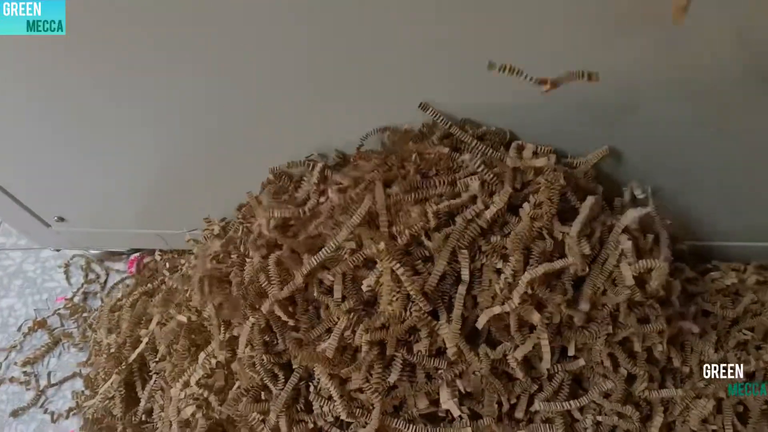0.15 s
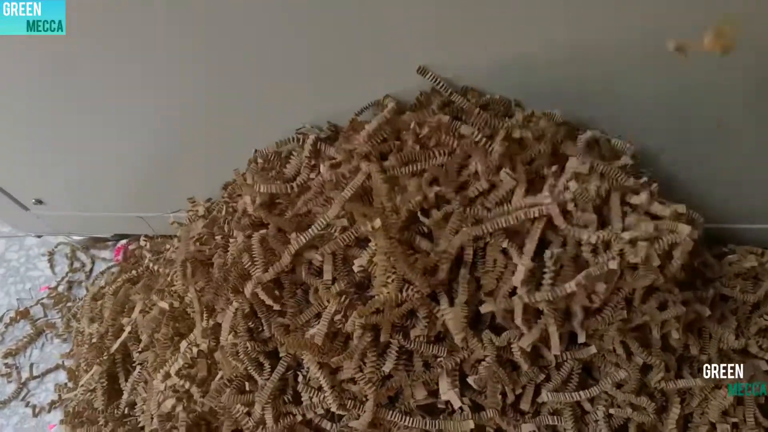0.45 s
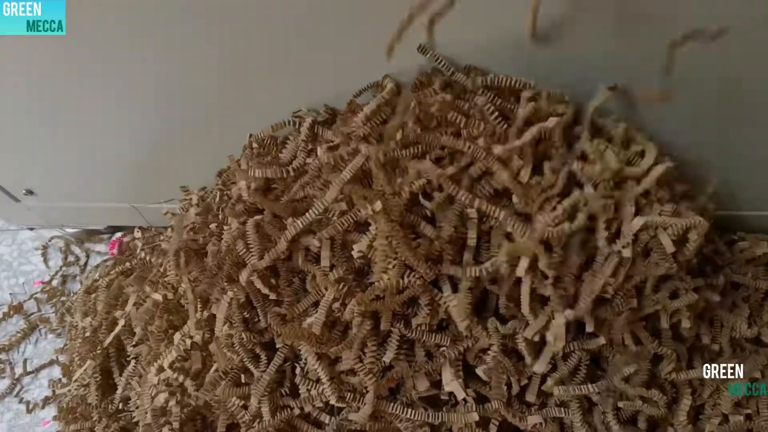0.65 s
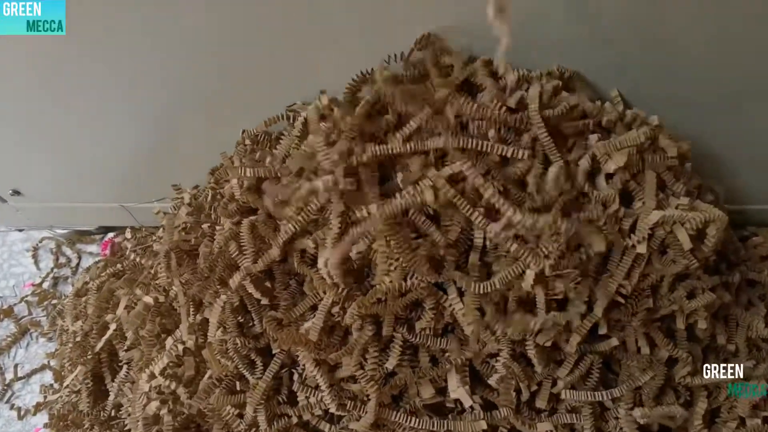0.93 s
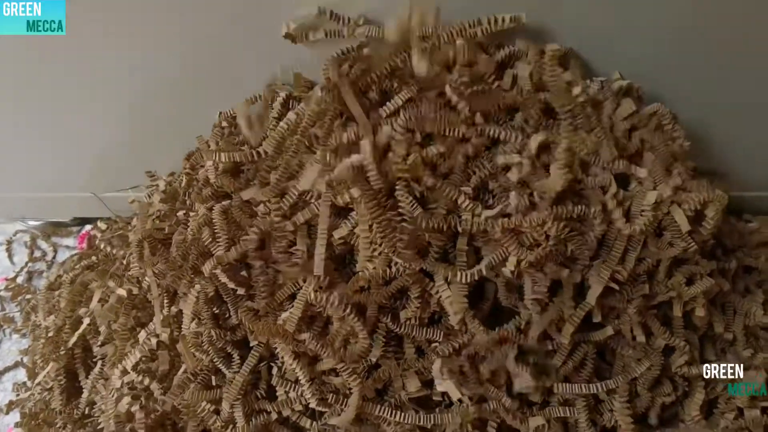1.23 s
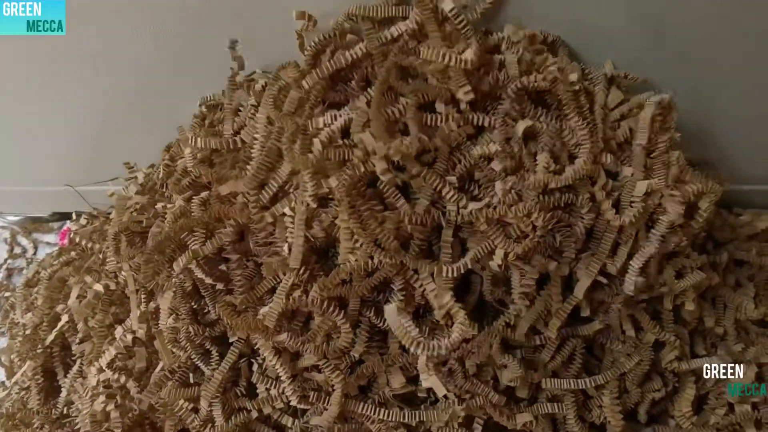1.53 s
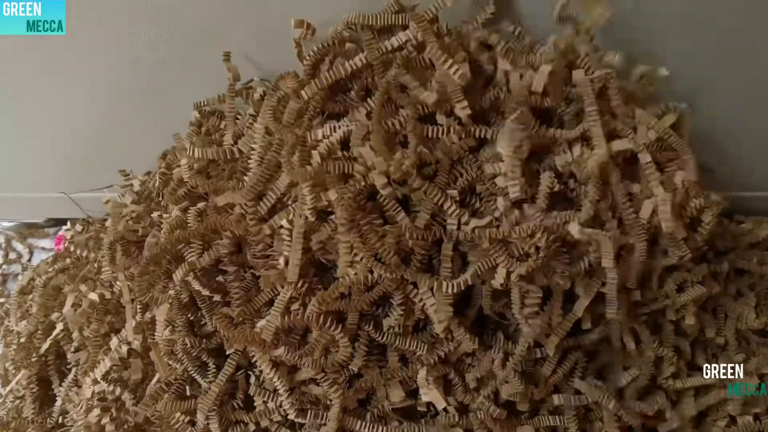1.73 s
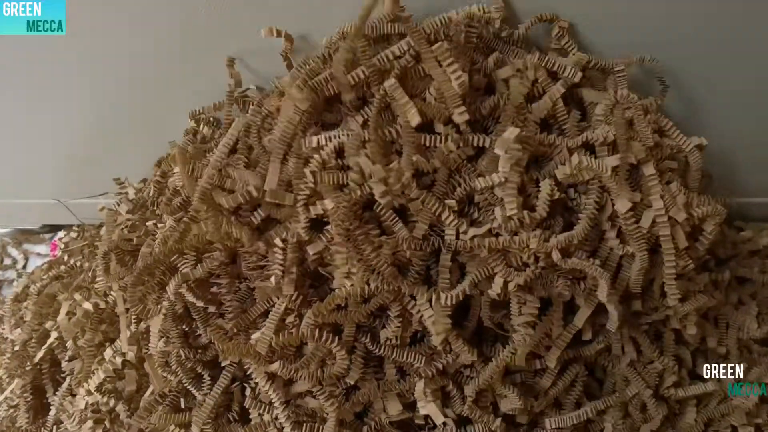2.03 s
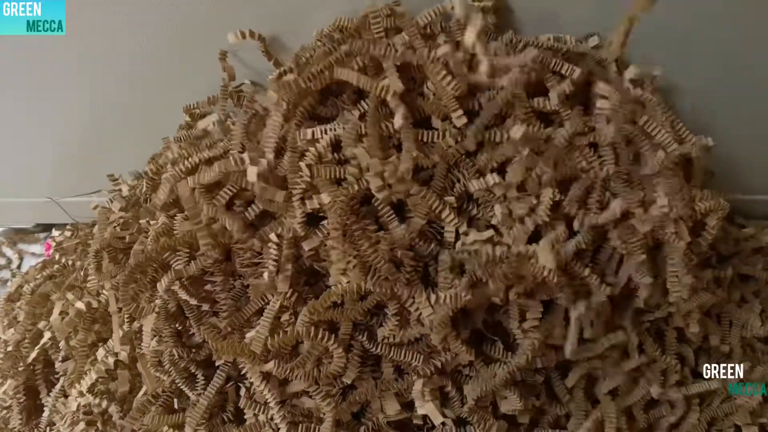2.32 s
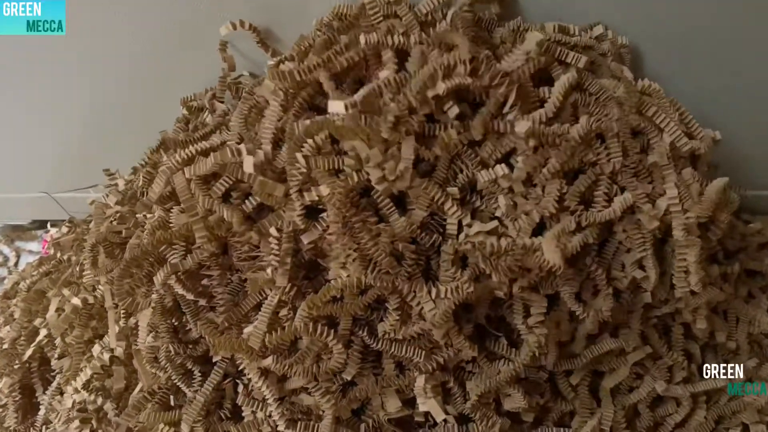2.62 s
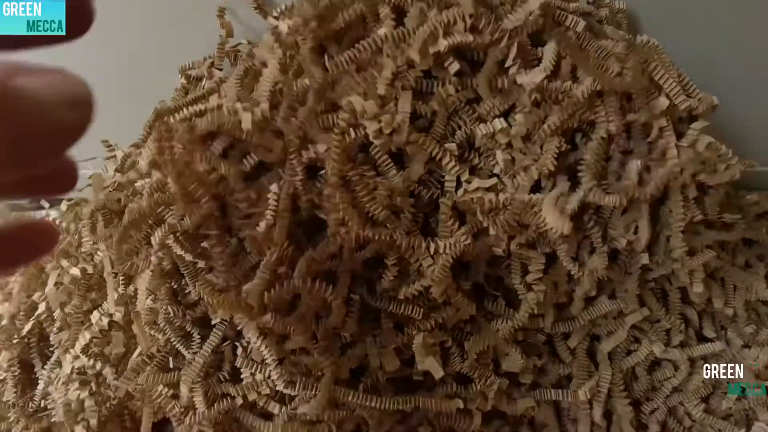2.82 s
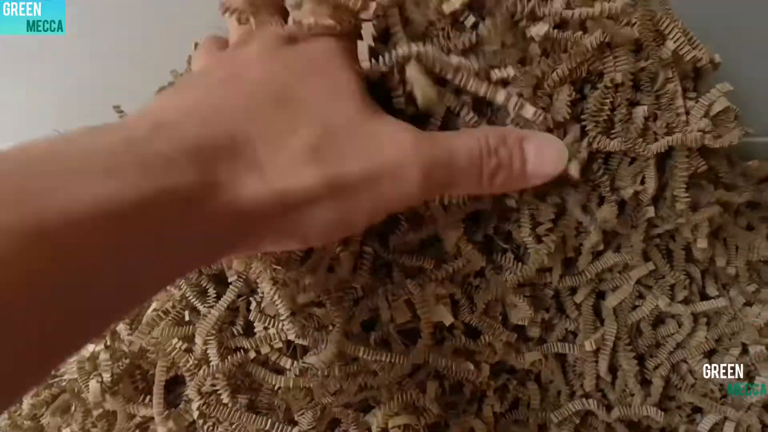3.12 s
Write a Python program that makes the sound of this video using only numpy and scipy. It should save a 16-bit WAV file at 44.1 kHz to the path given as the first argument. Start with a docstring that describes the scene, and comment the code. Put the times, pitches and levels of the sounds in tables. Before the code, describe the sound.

Steady low drone of an electric paper shredder, slightly beating, with muffled mechanical grinding, quiet papery crackle, thin fluttering whine and occasional soft case knocks; close stereo microphone in a small, fairly dry indoor space.

```python
"""In a workshop, an induction motor drives a paper shredder, heard through two microphone ports.
The windings hum at about twice the mains rate: phase-locked partials, beside gear tones that beat with the hum.
Gears and cutters are noise rushing through the resonances of the housing, pulsing with the shaft.
A thin whine flutters, paper parts in short clicks and drags in brief bands of noise.
The machine knocks softly: decaying modes of its case."""
import sys
import numpy as np
from scipy import signal
from scipy.fft import rfft, irfft, next_fast_len
from scipy.io import wavfile
from scipy.ndimage import uniform_filter1d, map_coordinates

SR = 44100
rng = np.random.default_rng(int(sys.argv[2]) if len(sys.argv) > 2 else 0)


def transcribe(signal):
    """Save signal, clipped to [-1, 1], as a 16-bit WAV file at the path in sys.argv[1]."""
    frames = np.atleast_2d(signal).T
    limited = np.clip(frames, -1, 1)
    pcm = np.round(limited * 32767).astype(np.int16)
    wavfile.write(sys.argv[1], SR, pcm)


def elevation(decibels):
    """Turn decibel levels (scalar or array-like) into linear amplitude ratios."""
    levels = np.asarray(decibels, float)
    return 10 ** (levels / 20)


N = 143766  # length in samples

# Hum of the windings: (t/s, level/dB)
HUM_LEVEL = [(0.06, -9), (0.14, -10), (0.38, -13), (0.57, -9.5), (0.94, -12.5), (1.19, -9), (1.53, -15),
             (1.73, -9.5), (2.07, -12.5), (2.32, -9), (2.59, -13), (2.85, -9.5), (3.2, -13)]
# Octave of the hum: (t/s, level/dB)
OCTAVE_LEVEL = [(0.06, -33), (0.25, -35.5), (0.42, -25.5), (0.49, -32), (0.96, -29.5), (1.32, -37),
                (1.41, -26), (1.74, -29.5), (1.78, -39), (1.87, -29.5), (1.94, -36.5), (2.08, -23),
                (2.18, -39), (2.24, -28), (2.31, -38), (2.64, -30), (2.92, -33), (3.2, -29)]
# Upper partials of the hum, before a common trim: (t/s, third level/dB, fourth level/dB, seventh level/dB)
UPPER_LEVELS = [(0.06, -40, -29, -48), (0.12, -35, -47, -48), (0.17, -54, -41, -38),
                (0.53, -34.5, -33.5, -54), (0.6, -29, -35, -44), (0.73, -41.5, -59, -45),
                (0.84, -37, -52, -30), (0.98, -43, -55, -46), (1.04, -35.5, -35.5, -48),
                (1.5, -40, -54, -45), (1.65, -47, -34, -41), (1.69, -48, -48, -45), (1.76, -28, -36, -50),
                (1.83, -57, -46, -33), (1.96, -33.5, -56, -48), (2.21, -41, -32, -45),
                (2.26, -34, -44, -45), (2.33, -42, -45, -42), (2.53, -34, -50, -48), (2.56, -34, -43, -61),
                (2.65, -41, -40, -42), (2.95, -43, -45, -47), (3.1, -38, -63, -51), (3.2, -39, -45, -39)]
# Audible multiples of the hum frequency: (order, ..)
UPPER_ORDERS = (3, 4, 7)
# Audible multiples of the gear shaft's rate: (order, ..)
GEAR_ORDERS = (2, 3, 4, 9)
# Mean level of each gear order: (level/dB, ..)
GEAR_LEVELS = (-46, -31.5, -38, -47.5)
# Wavering tones of motor and gears: (f/Hz, left level/dB, right level/dB, waver/dB)
STEADY_TONES = [(91.9, -46, -49, -2), (183.5, -36.5, -40, 0), (300, -43, -41, -0.5), (435, -43.5, -54.5, 3),
                (442, -49, -63, 8.5), (495.5, -49.5, -54.5, 5.5), (671, -54, -60, 5),
                (729, -55.5, -59, 7.5)]
# Whine of the machine, the scale of its lines and band: (t/s, level/dB)
WHINE_LEVEL = [(0.06, -45.5), (0.17, -53), (0.2, -59), (0.31, -45), (0.42, -55), (0.49, -44), (1.01, -54),
               (1.04, -46), (1.54, -59), (1.57, -45), (1.6, -59), (1.83, -49), (1.85, -56), (2.14, -57),
               (2.18, -58), (2.34, -48), (2.56, -56), (2.95, -44), (3.13, -53), (3.2, -48.5)]
# Thin lines relative to the whine: (f/Hz, level/dB)
WHINE_LINES = [(4275, -5.5), (4325, -12)]
# Ringing band relative to the whine: (f/Hz, width/Hz, level/dB)
WHINE_BAND = (4280, 160, -1.1)
# Relative spectral density of the frame's rumble: (f/Hz, level/dB per Hz)
RUMBLE_SPECTRUM = [(20, -19), (60, -14.5), (80, -6.5), (135, -3.5), (165, -6.5), (220, -7.5), (330, -11.5),
                   (450, -10.5), (550, -20.5), (700, -36.5)]
# Low grind of the gears, before a fixed lift: (t/s, level/dB)
GRIND_LEVEL = [(0.06, -35), (0.07, -40), (0.21, -29.5), (0.24, -37), (0.65, -35), (0.66, -29), (0.7, -34.5),
               (1.8, -37), (1.83, -35.5), (2.08, -36), (2.48, -35), (2.53, -38), (2.74, -34.5),
               (2.81, -37.5), (2.85, -34), (3.15, -42), (3.16, -37.5), (3.2, -37)]
# Relative spectral density of the grind: (f/Hz, level/dB per Hz)
GRIND_SPECTRUM = [(330, -38), (560, -7), (597, -3), (691, 0), (762, -7), (886, -8.5), (1540, -12),
                  (1700, -23), (1800, -21.5), (2340, -48), (3960, -120)]
# Cutting effort, the scale of treble, housing and snips: (t/s, level/dB)
CUTTING_LEVEL = [(0.06, -42), (0.2, -40.5), (0.39, -43), (0.8, -40), (0.85, -39), (0.86, -41), (1.0, -42),
                 (1.06, -40), (1.07, -39), (1.48, -42.5), (1.69, -39.5), (1.71, -41.5), (1.86, -40),
                 (1.88, -41.5), (2.48, -40), (2.51, -42.5), (2.86, -39.5), (3.2, -43)]
# Relative spectral density of the treble rush: (f/Hz, level/dB per Hz)
TREBLE_SPECTRUM = [(940, -27), (1600, -4.5), (1730, -5.5), (2260, -5), (3890, -7), (4410, -6.5),
                   (4990, -10), (5810, -7), (9460, -20.5), (10300, -17.5), (11600, -21.5), (12500, -17),
                   (15700, -15)]
# Housing resonances, weighted relative to the treble spectrum: (f/Hz, width/Hz, level/dB)
HOUSING_MODES = [(2795, 54, 11), (4460, 70, 4), (5730, 180, -2.5)]
# Frame and panel modes that colour every rush: (f/Hz, width/Hz, lift/dB)
PANEL_MODES = [(134, 16, 3), (220, 19, 4), (240, 15, -1.5), (266, 20, 1), (303, 13.5, 7), (389.4, 29, 4),
               (514, 9, 4.5), (597, 13, 9), (632, 17, 3), (696, 33, 4), (804, 25, 5.5), (837, 20, 0.5),
               (956, 22, 5), (1103, 24, 6.5), (1182, 77, 4.5), (1330, 60, 5), (1393, 28, 5.5),
               (1544, 25, 7), (1557, 17, 0.5), (1910, 37, 2.5), (2033, 53, 1), (2270, 36, 5), (2315, 37, 6)]
# Likeness of left and right in the rushes: (f/Hz, correlation)
LIKENESS = [(60, 0.68), (130, 0.72), (290, 0.84), (640, 0.67), (1410, -0.14), (3100, -0.01), (6820, 0.1),
            (15000, -0.17)]
# Left over right in the rushes: (f/Hz, level/dB)
BALANCE = [(60, -2), (110, 6.5), (200, 3.0), (380, 8), (700, 3), (1290, 6.5), (2380, 3), (4400, 5.5),
           (8120, 6.5), (15000, 0)]
# Soft blows, relative strength: (t/s, level/dB, tilt/dB per octave)
KNOCK_EVENTS = [(0.485, -19.5, -5), (0.658, -18.5, 4.5), (1.04, -21, -7), (1.837, -21, -4),
                (2.193, -25, 0.1), (2.677, -26, -3), (2.715, -22.5, -5), (3.162, -24, -3)]
# Modes of the case, relative strength: (f/Hz, level/dB, 60 dB decay time/s)
CASE_MODES = [(380, -1, 0.058), (642, 7, 0.053), (889, 2, 0.065), (1283, -12, 0.072), (2200, -18, .04),
              (3000, -26, 0.025)]
# Paper dragging: (centre t/s, full length at 1/e /s, level/dB, f/Hz)
SCRAPE_EVENTS = [(0.834, 0.046, -38, 3080), (2.742, 0.054, -40, 2400)]

HUM_HZ, HUM_CREST_S, HUM_LEAD_RAD = 99.97, .0088, 0.13  # the lead is left over right
HUM_PAN_DB, OCTAVE_PAN_DB, UPPER_PAN_DB, GEAR_PAN_DB = 2, 4, (4, 6, 5), 2  # left over right
GEAR_HZ = 35.89
SHAFT_HZ, SHAFT_DEPTH_DB = 24.9, 0.5
SNIPS_PER_S, SNIP_HZ, SNIP_SPREAD_DB = 500, 3500, 11
ROOM_T60_S, ROOM_SHARE = 0.26, 0.31  # share of noise power common to both ports
KNOCK_DB, KNOCK_RISE_S = -11, 0.0011

TIME_S = np.arange(N) / SR
HALF = np.array([[.5], [-.5]])  # left and right shares of a stereo difference


def unit(x):
    """Normalization: scales a signal to rms 1."""
    return x / np.sqrt(np.mean(x ** 2) + 1e-20)


def along(points, hz):
    """Logarithmic frequency scale: interpolates (f/Hz, value) points on it."""
    f, v = np.transpose(points)
    return np.interp(np.log(hz + 1), np.log(f + 1), v)


def curves(rows):
    """Envelopes: linear interpolation of each column after the time, one value per sample."""
    s, *cols = np.transpose(rows)
    return [np.interp(TIME_S, s, c) for c in cols]


def wobble(rate):
    """Slow random modulation: a smooth curve through random knots, rate of them per second."""
    knots = rng.standard_normal(int(N * rate / SR) + 4)
    return map_coordinates(knots, [np.arange(N) * rate / SR])


def filtered(x, response):
    """Linear filtering: multiplies the spectrum by a response of frequency."""
    m = next_fast_len(N + SR // 2)
    return irfft(rfft(x, m) * response(np.fft.rfftfreq(m, 1 / SR)), m)[..., :N]


def panel_lift(hz):
    """Modal resonance: each panel mode raises or lowers the level around its frequency."""
    return elevation(sum(db / (1 + (2 * (hz - centre) / width) ** 2) for centre, width, db in PANEL_MODES))


def patchy_noise(patchy_db):
    """Random modulation in time and frequency: three noises share one patchwork of gain."""
    z = signal.stft(rng.standard_normal((3, N)), nperseg=512)[2]
    field = uniform_filter1d(rng.standard_normal(z.shape[1:]), size=5, axis=0)
    field = uniform_filter1d(field, size=8, axis=1)
    return signal.istft(z * elevation(patchy_db * unit(field)), nperseg=512)[1][:, :N]


def rush(gain, patchy_db):
    """Partial coherence: stereo noise of rms 1, part of it one source heard by two room paths."""
    noise = patchy_noise(patchy_db)
    decay = elevation(-60 * np.arange(SR // 4) / SR / ROOM_T60_S)
    paths = rng.standard_normal((2, SR // 4)) * decay
    shared = unit(signal.fftconvolve(noise[2:], paths, axes=1)[:, :N])
    a, b = np.sqrt(1 - ROOM_SHARE) * unit(noise[:2]) + np.sqrt(ROOM_SHARE) * shared

    def mid_side_gain(hz):
        angle = np.arccos(np.clip(along(LIKENESS, hz), -1, 1)) / 2
        return gain(hz) * panel_lift(hz) * [np.cos(angle), np.sin(angle)]

    mid, side = filtered(np.array([a + b, a - b]), mid_side_gain)
    stereo = np.array([mid + side, mid - side])
    return unit(filtered(stereo, lambda hz: elevation(along(BALANCE, hz) * HALF)))


def closed(points):
    """Band limitation: gain of a spectrum that is silent outside its points."""
    return lambda hz: elevation(along(points, hz)) * (hz >= points[0][0]) * (hz <= points[-1][0])


def band(hz, width_hz):
    """Resonance: noise ringing in one mode, at rms 1."""
    return rush(lambda f: 1 / (1 + (2 * (f - hz) / width_hz) ** 2), patchy_db=0.5)


def windings():
    """Harmonic series: the hum's octave and upper partials follow multiples of its phase."""
    turn = 2 * np.pi * HUM_HZ * (TIME_S - HUM_CREST_S) + HUM_LEAD_RAD * HALF + .05 * wobble(2.5)
    hum = elevation(curves(HUM_LEVEL)[0] + HUM_PAN_DB * HALF) * np.cos(turn)
    octave_turn = 2 * turn + 0.12 * wobble(6.24)
    octave = elevation(curves(OCTAVE_LEVEL)[0] + OCTAVE_PAN_DB * HALF) * np.cos(octave_turn)
    upper = 0
    for order, db, pan_db in zip(UPPER_ORDERS, curves(UPPER_LEVELS), UPPER_PAN_DB):
        upper = upper + elevation(db - 3.0 + pan_db * HALF) * np.cos(order * turn + 0.87 * wobble(9))
    return np.sqrt(2) * (hum + octave + upper)


def gear_orders():
    """Beating: multiples of a gear shaft's rate interfere with the neighbouring hum."""
    out = 0
    for order, db in zip(GEAR_ORDERS, GEAR_LEVELS):
        level = elevation(db + GEAR_PAN_DB * HALF + wobble(2.9))
        out = out + level * np.cos(2 * np.pi * order * GEAR_HZ * TIME_S)
    return np.sqrt(2) * out


def wavering_tones():
    """Amplitude and phase modulation: tones of motor and gears waver slowly about fixed frequencies."""
    out = 0
    for hz, left_db, right_db, waver_db in STEADY_TONES:
        level = elevation(np.array([[left_db], [right_db]]) + waver_db * wobble(4.94))
        phase = 2 * np.pi * rng.random() + 0.54 * wobble(4.06)
        out = out + level * np.cos(2 * np.pi * hz * TIME_S + phase)
    return np.sqrt(2) * out


def motor():
    """Superposition: the tones of windings, gears and motor add."""
    return windings() + gear_orders() + wavering_tones()


def whine():
    """Narrow-band modulation: two thin fluttering lines inside a narrow ringing band."""
    lines = 0
    for hz, db in WHINE_LINES:
        level = elevation(db + 3.4 * wobble(25) + np.array([[2.5], [-3.5]]))
        phase = np.array([1.5 * wobble(15), 1.3 * wobble(14)])  # left and right drift apart
        lines = lines + level * np.cos(2 * np.pi * hz * TIME_S + phase)
    hz, width_hz, band_db = WHINE_BAND
    ringing = elevation(band_db + 4.3 * wobble(25)) * band(hz, width_hz)
    return elevation(curves(WHINE_LEVEL)[0]) * (np.sqrt(2) * lines + ringing)


def rumble():
    """Broadband vibration: the frame shakes in broad low bands."""
    return elevation(-28.5 + 0.76 * wobble(2.68)) * rush(closed(RUMBLE_SPECTRUM), patchy_db=2.5)


def grind(shaft_db):
    """Amplitude modulation: the shaft pulses the low noise of the gears."""
    level_db = curves(GRIND_LEVEL)[0] + 1.5 + shaft_db + .5 * wobble(11)
    return elevation(level_db) * rush(closed(GRIND_SPECTRUM), patchy_db=1.5)


def treble_rush(shaft_db):
    """Amplitude modulation: the shaft pulses the treble noise of the cutters."""
    return elevation(3.5 + shaft_db + 0.34 * wobble(12)) * rush(closed(TREBLE_SPECTRUM), patchy_db=1.5)


def housing():
    """Resonance: the modes of the housing ring with noise, each flickering slightly in level."""
    ring = 0
    for hz, width_hz, db in HOUSING_MODES:
        level = elevation(db + along(TREBLE_SPECTRUM, hz) - 0.5 * wobble(14))
        # the root of the width turns density into level
        ring = ring + level * np.sqrt(width_hz) * band(hz, width_hz)
    return unit(ring)


def snips():
    """Impulse excitation: paper parts under the blades as random clicks in one damped resonance."""
    draws = rng.random((int(SNIPS_PER_S * N / SR), 3))
    places = (draws[:, 0] * N).astype(int)
    size = elevation(SNIP_SPREAD_DB * draws[:, 1] ** 2)
    left_share = draws[:, 2]
    clicks = np.array([np.bincount(places, size * share, N) for share in (left_share, 1 - left_share)])

    def resonance(f):
        return 1j * f * SNIP_HZ / (SNIP_HZ ** 2 - f * f + 1.2j * f * SNIP_HZ)

    return unit(filtered(clicks, resonance))


def cutters():
    """Common modulation: one effort curve scales treble, housing and snips; grind has its own curve."""
    shaft_db = SHAFT_DEPTH_DB * np.cos(2 * np.pi * SHAFT_HZ * TIME_S + wobble(2))
    cutting = treble_rush(shaft_db) + elevation(-11.5) * housing() + elevation(-15) * snips()
    return grind(shaft_db) + elevation(curves(CUTTING_LEVEL)[0]) * cutting


def knocks():
    """Modal decay: soft blows inside the case ring its modes, which die away exponentially."""
    out, t = np.zeros((2, N + SR)), np.arange(SR // 8) / SR
    tilt_hz = CASE_MODES[1][0]  # the tilt pivots on the second mode
    for s, db, tilt_db in KNOCK_EVENTS:
        ring = 0
        for hz, mode_db, t60 in CASE_MODES:
            level_db = mode_db + tilt_db * np.log2(hz / tilt_hz) + rng.normal(0, 2.2, (2, 1))
            mode = np.sin(2 * np.pi * hz * rng.normal(1, 0.031) * t)
            ring = ring + elevation(level_db - 60 * t / t60) * mode
        rise = 1 - np.exp(-t / KNOCK_RISE_S)
        start = round(s * SR)
        out[:, start:start + len(t)] += elevation(db + KNOCK_DB + np.array([[2], [-2]])) * ring * rise
    return out[:, :N]


def scrapes():
    """Friction noise: paper drags in brief bands of noise under a Gaussian envelope."""
    out = 0
    for s, length, db, hz in SCRAPE_EVENTS:
        envelope = np.exp(-((TIME_S - s) / length * 2) ** 2)
        out = out + elevation(db) * envelope * band(hz, 0.51 * hz)
    return out


def scene():
    """Superposition: all parts of the machine add."""
    return motor() + whine() + rumble() + cutters() + knocks() + scrapes()


def roll_off(x):
    """The treble ends steeply here."""
    return signal.sosfilt(signal.butter(12, 16480, fs=SR, output="sos"), x)


def record(dry):
    """Signal chain: the finished mix passes through the last stage."""
    return roll_off(dry)


dry = scene()
out = record(dry)
transcribe(out)
```